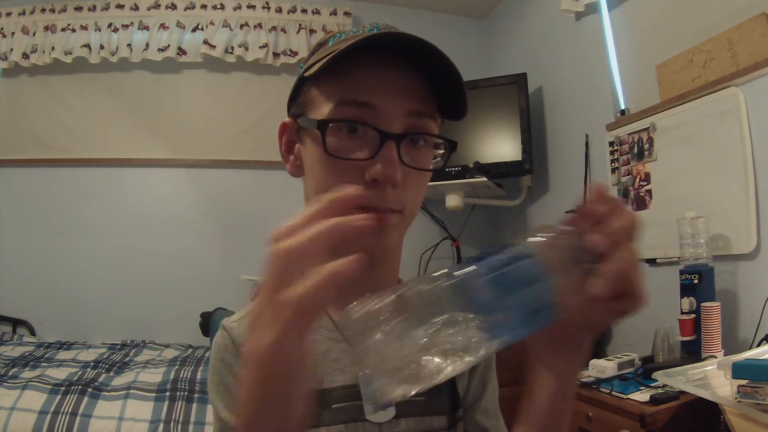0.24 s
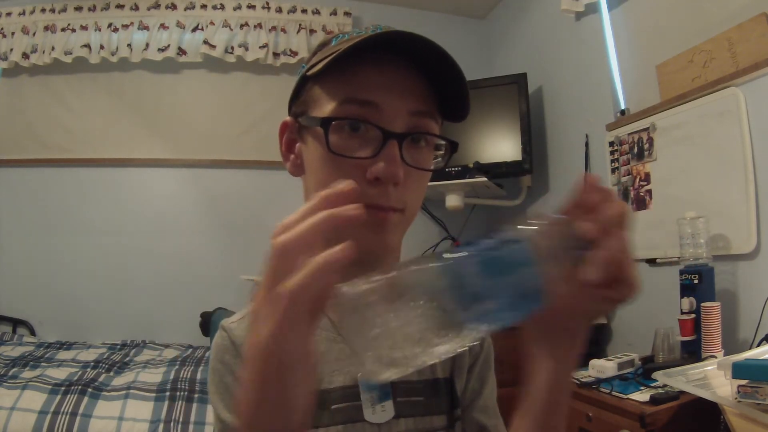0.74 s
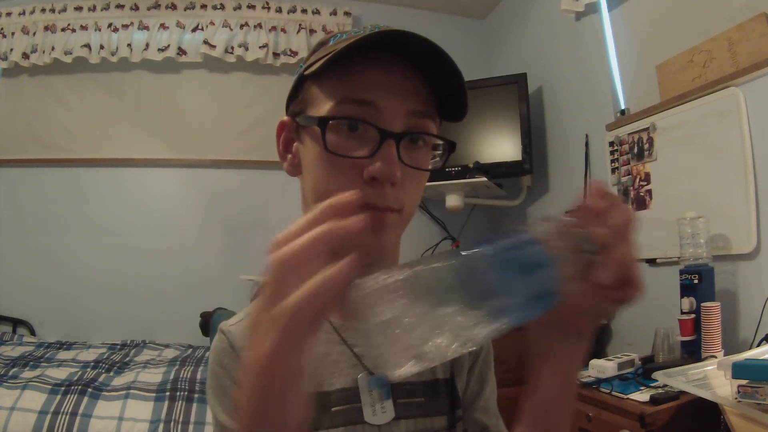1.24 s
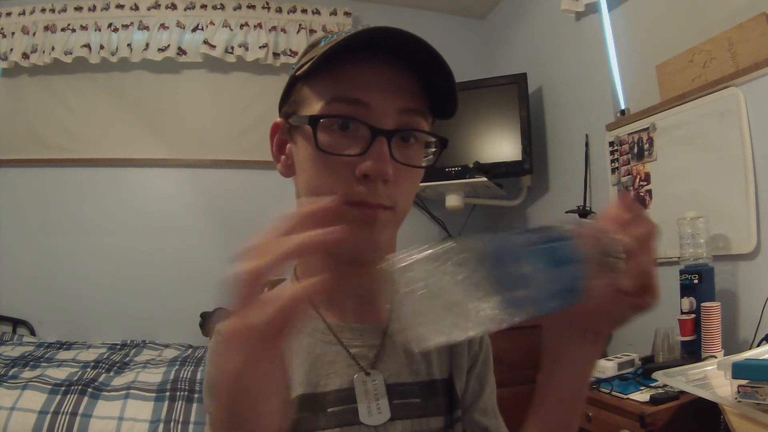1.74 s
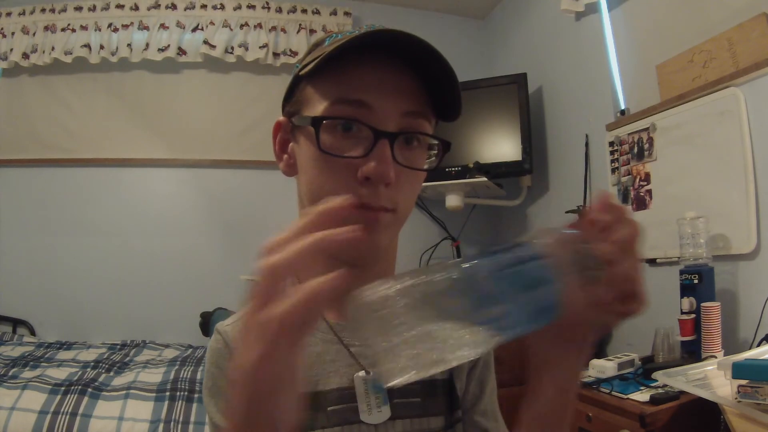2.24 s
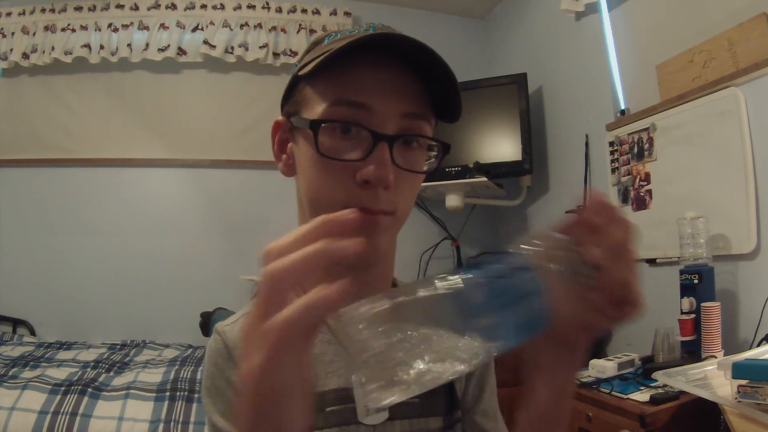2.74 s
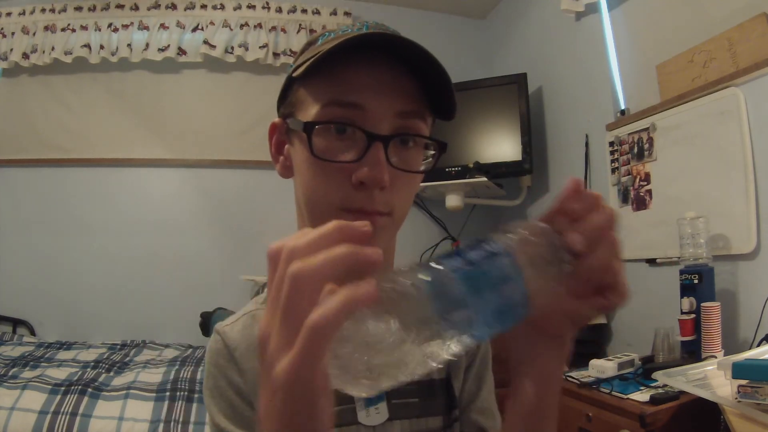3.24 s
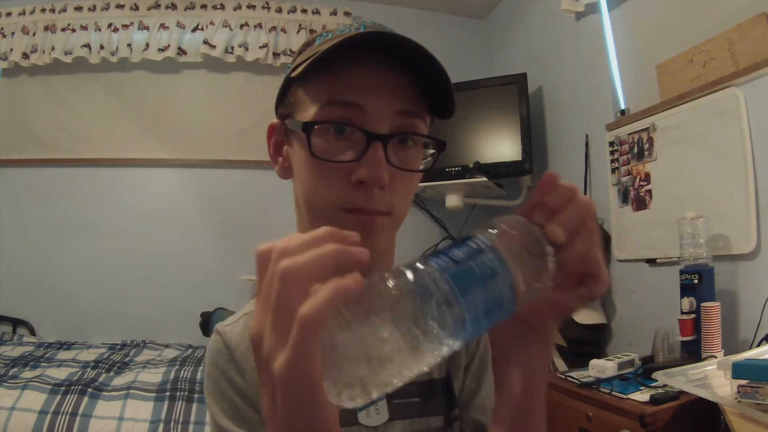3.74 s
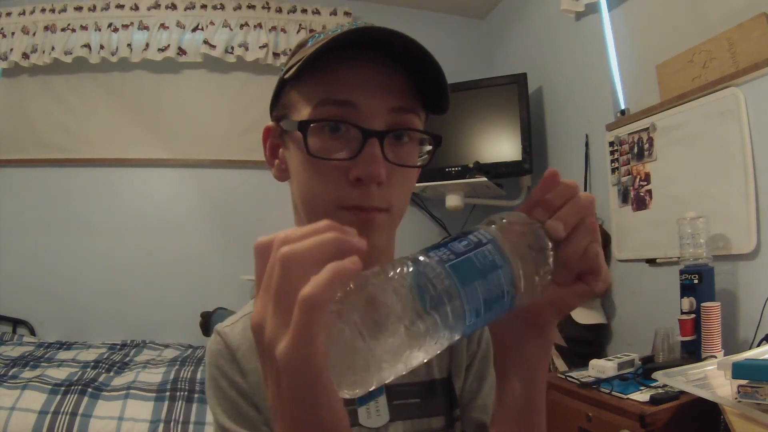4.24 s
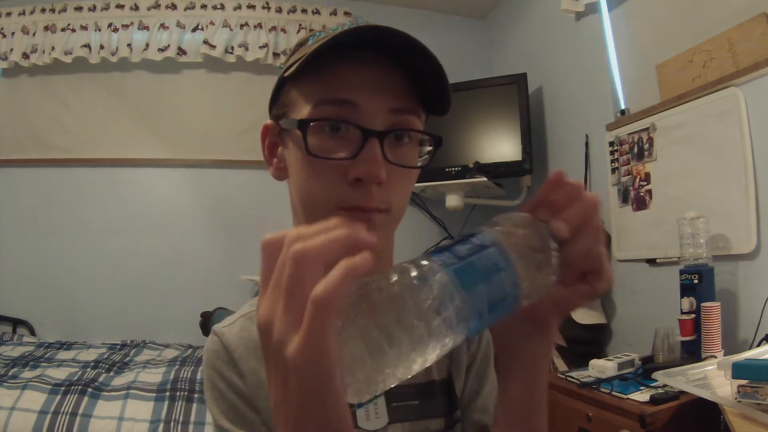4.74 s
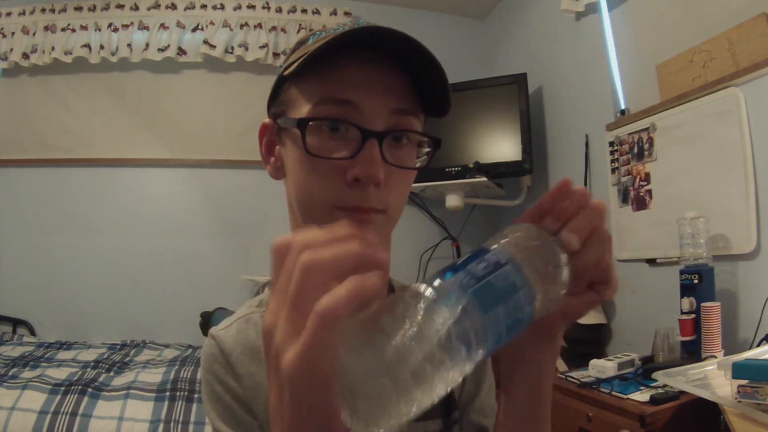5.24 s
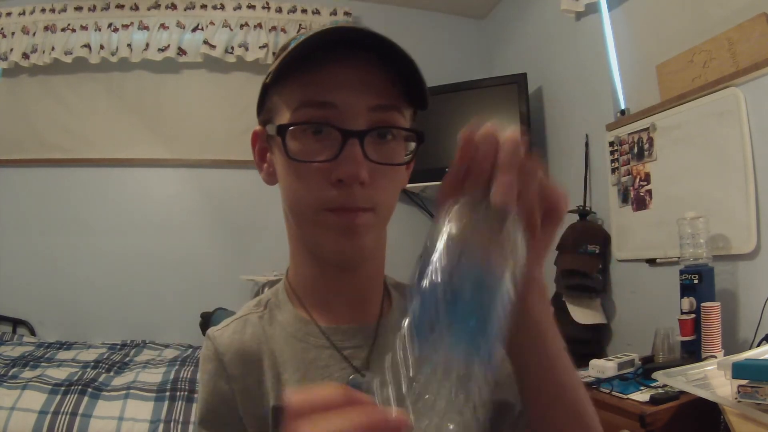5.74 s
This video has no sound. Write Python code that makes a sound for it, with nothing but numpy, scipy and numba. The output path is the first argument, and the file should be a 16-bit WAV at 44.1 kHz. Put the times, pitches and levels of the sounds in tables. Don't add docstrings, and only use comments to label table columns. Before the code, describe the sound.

Water slams rhythmically inside a flimsy plastic bottle in a quiet bedroom, with sharp crackles, fizzy spray and small pops after each thud.

```python
import sys
import numpy as np
from scipy import signal
from scipy.fft import rfft, irfft
from scipy.io import wavfile
from scipy.ndimage import uniform_filter1d, map_coordinates
from numba import njit

SR = 44100
rng = np.random.default_rng(int(sys.argv[2]) if len(sys.argv) > 2 else 0)


def gain_from_db(level_db):
    decades = np.asarray(level_db, float) / 20
    return 10 ** decades


def persist_wave(psi):
    counts = np.round(np.clip(psi, -1, 1) * 32767).astype(np.int16)
    wavfile.write(sys.argv[1], SR, np.atleast_2d(counts).T)


N = 265041

SIZE_CLASS_HZ = [
    300,
    1100,
    3300,
    8800,
]
# first_touch_s, deepest_push_s
IMPACTS = [(.5177, .5202), (1.0228, 1.0261), (1.5068, 1.5096), (1.9745, 1.9812), (2.498, 2.5015),
           (3.0445, 3.0485), (3.5752, 3.5786), (4.127, 4.1312), (4.655, 4.6598), (5.198, 5.2008),
           (5.7695, 5.7745)]


def level(x, db):
    return x * gain_from_db(db) / np.sqrt(np.mean(x ** 2))


def read(table, hz):
    f, db = np.transpose(table)
    return np.interp(np.log(np.maximum(hz, 1)), np.log(f), db)


def shaped(gain, size):
    return irfft(rfft(rng.standard_normal(size)) * gain(np.fft.rfftfreq(size, 1 / SR)), size)


def add(out, s, x):
    i = int(s * SR)
    out[i:i + len(x)] += x[:len(out) - i]


@njit
def grains(count, start, hz, cycles, gain, glide):
    out = np.zeros(count)
    for k in range(len(start)):
        i, step, envelope, phase = start[k], 2 * np.pi * hz[k] / 44100, 1., 0.
        fall = np.exp(-hz[k] / (cycles[k] * 44100))
        rise = 1 + glide[k] * (1 - fall)
        while envelope > .003 and i < count:
            out[i] += gain[k] * envelope * np.sin(phase)
            phase += step
            step = min(step * rise, 2.8)
            envelope *= fall
            i += 1
    return out


def hush():
    # pitch_hz, density_db (per Hz)
    hiss = [(15, -15), (25, 6.5), (133, -6), (173, -5), (274, -13.5), (349, -26.5), (495, -6.5), (871, -64),
            (1110, -26), (1570, -19.5), (3440, -20), (3720, -21.5), (15500, -35.5)]
    # pitch_hz, width_hz, level_db
    hum = [
        (57.3, 10, -63),
        (119.8, 9.5, -68.5),
    ]
    out = level(shaped(lambda f: gain_from_db(read(hiss, f)), N), -62)
    for hz, width, db in hum:
        out += level(shaped(lambda f: np.exp(-((f - hz) / width) ** 2), N), db)
    return out


def room(x):
    # centre_hz, t60_s, level_db
    bands = [(247, 0.21, -25.5), (1520, 0.26, -16.5), (4170, 0.21, -11), (10400, 0.2, -3)]
    gap_ms = 1.0
    t = np.arange(SR // 2) / SR
    f = np.fft.rfftfreq(len(t), 1 / SR)
    tail = 0
    for hz, t60, db in bands:
        shape = np.exp(-np.log2(np.maximum(f, 1) / hz) ** 2)
        fade = np.exp(-np.log(1000) * t / t60) * np.clip(t * 1000 / gap_ms - .5, 0, 1)
        tones = rfft(rng.standard_normal(len(t)) * fade)
        tones /= np.sqrt(uniform_filter1d(np.abs(tones) ** 2, size=25))
        band = irfft(tones * shape, len(t))
        band[-len(t) // 8:] = 0
        tail = tail + gain_from_db(db) * band / np.sqrt(np.sum(band ** 2))
    return signal.fftconvolve(x, tail)[:N]


def colour(hz):
    # pitch_hz, density_db (per Hz)
    splash = [(88, -30), (150, 1), (337, 5), (393, -4), (459, 2), (742, -3.5), (1770, -11), (2100, -7.5),
              (4810, -9), (7500, -12), (15000, -29.5)]
    octave = lambda f: read(splash, f) + 10 * np.log10(f)
    centres = np.array(SIZE_CLASS_HZ)
    return octave(hz) - np.interp(np.log(hz), np.log(centres), octave(centres))


def sloshing(t):
    # jerk_s, run_up_db, splash_db, splash_hold_s, drained_db
    swings = [(-.1, -45, -37.5, 0.049, -66), (0.418, -43, -35, 0.031, -67.5), (.925, -44, -35, 0.028, -66),
              (1.388, -47.5, -36, 0.056, -66.5), (1.878, -45.5, -37.5, 0.027, -67),
              (2.399, -47.5, -36.5, 0.036, -66.5), (2.93, -48.5, -34.5, 0.027, -66),
              (3.466, -44, -37, 0.047, -67.5), (4.007, -43.5, -34, 0.036, -65.5),
              (4.542, -45, -34.5, 0.033, -67), (5.093, -47, -35.5, 0.013, -66.5),
              (5.74, -57, -41, 0.12, -57)]
    # start_s, level_db, gurgle_db
    shakes = [
        (0.636, -25, -15),
        (2.42, -41, -8),
        (2.438, -42.5, 8),
        (2.66, -51, -7),
        (3.004, -33, 2),
        (3.254, -54, 7),
        (4.79, -57, -6),
        (5.183, -46, -10),
        (5.416, -50.5, 9.5),
    ]
    # (slosh dB, gurgle dB, spray dB)
    running, slamming, spraying = (-18, -6.5, -9.5), (7.3, 1.7, -8.5), (-15.5, -11.5, -7)
    falling, drained = (-13.5, -7, -8.5), (3.2, 3.5, -8.5)
    rise_s, contact_s, collapse_s, drain_s = 0.027, 0.0054, 0.065, 0.1356
    shake_fall_db_per_s = 394

    def sizes(db, share):
        return db + np.array([share[0], share[1], 0, share[2]])

    knots, levels = [], []
    slam_s = [-.01] + [touch for touch, _ in IMPACTS]
    next_jerk_s = [row[0] for row in swings[1:]] + [np.inf]
    for (jerk, run_db, db, hold, dry_db), slam, after in zip(swings, slam_s, next_jerk_s):
        spray = slam + contact_s
        fallen = spray + hold + collapse_s
        knots += [min(jerk + rise_s, slam), slam, spray, fallen - collapse_s, fallen,
                  min(fallen + drain_s, after), min(after, fallen + 1)]
        levels += [sizes(run_db, running),
                   sizes(run_db + 5, running),
                   sizes(db - 1.5, slamming),
                   sizes(db, spraying),
                   sizes(db - 10.5, falling),
                   sizes(dry_db + 2.5, drained),
                   sizes(dry_db, drained)]
    knots = np.maximum.accumulate(knots)
    power = gain_from_db([np.interp(t, knots, c) for c in np.transpose(levels)]) ** 2
    for s, db, gurgle_db in shakes:
        shower_db = sizes(db, (-18, gurgle_db, -19))[:, None] - shake_fall_db_per_s * np.abs(t - s)
        power += (t > s) * gain_from_db(shower_db) ** 2
    return 10 * np.log10(power)


def water():
    count, cycles, glide, base_db = 75000, 3.85, 0.0954, -3.5
    scatter_db, patchy_db, clump_db = 3.0, 3.0, 3.0
    when, size, loud, life = rng.random((count, 4)).T
    when = when * N / SR
    blobs = rng.random((1500, 2))
    blob = rng.integers(0, len(blobs), count // 3)
    clumped = len(blob)
    when[:clumped] = np.minimum(blobs[blob, 0] * N / SR + .001 * life[:clumped], N / SR)
    clump = np.zeros(count)
    clump[:clumped] = clump_db * (-np.log(1 - .98 * blobs[blob, 1]) - 1)
    hz = 150 * 100 ** np.sqrt(size)
    place = np.interp(np.log(hz), np.log(SIZE_CLASS_HZ), np.arange(4))
    motion = map_coordinates(sloshing(when), [place, np.arange(count)], order=1)
    tilt = colour(hz) + 10 * np.log10(hz / 3300) - 10 * np.log10(np.sqrt(size) + 0.12)
    patches = rng.standard_normal((16, 310))
    tilt += patchy_db * map_coordinates(patches, [2 * np.log2(hz / 150), when * 50], order=1)
    turns = cycles * (0.57 + life + 2.745 * life ** 6)
    scatter = scatter_db * np.minimum(-np.log(1 - loud), 5)
    db = motion + tilt + scatter + clump - 10 * np.log10(turns) + base_db
    return grains(N, (when * SR).astype(np.int64), hz, turns, gain_from_db(db), glide + 0 * hz)


def snaps():
    # start_s, peak_db, pitch_hz, crack_db
    buckles = [(0.033, -28, 4500, -15), (0.459, -28, 3360, -6), (0.517, -21.5, 3000, -15),
               (0.517, -25, 935, -2), (0.634, -15.5, 2235, -8.5), (0.636, -32, 905, -30),
               (1.023, -17.5, 3150, -31), (1.507, -18, 2552, -10), (1.943, -22.5, 3444, -32),
               (1.951, -25, 1077, -4), (1.973, -20, 2740, -24), (2.043, -30.5, 3425, -2.5),
               (2.439, -27.5, 2480, -6.5), (2.442, -29, 1510, -25), (2.498, -29, 1310, -22),
               (3.003, -24.5, 3080, -15), (3.005, -31, 1130, -23), (3.046, -18.5, 2330, -23),
               (3.61, -24, 2250, -4), (4.128, -22.5, 2750, -7.5), (4.572, -30.5, 3750, -13),
               (4.628, -25.5, 2450, -26), (4.656, -25, 2230, -11), (5.183, -17, 2870, -9.5),
               (5.2, -25.5, 1050, -24.5), (5.198, -24, 2840, -11), (5.769, -31.5, 1310, -17)]
    # start_s, peak_db, pitch_hz
    creaks = [(0.429, -40, 6560), (0.442, -35.5, 4190), (0.925, -47, 4020), (0.949, -37, 3900),
              (1.008, -30.5, 1390), (1.401, -46, 1890), (1.416, -42, 3620), (1.468, -29.5, 3080),
              (1.871, -35, 4000), (1.913, -35, 3240), (1.913, -36.5, 1860), (2.408, -44, 3320),
              (2.427, -33, 3800), (2.466, -33, 3470), (2.948, -38, 3800), (2.958, -39, 3470),
              (3.475, -35, 6600), (3.485, -34.5, 4060), (3.491, -37.5, 4230), (3.537, -36, 3120),
              (4.012, -40.5, 4150), (4.033, -38, 4000), (4.05, -37, 2000), (4.083, -40, 2050),
              (4.105, -40, 3270), (4.551, -34, 4170), (5.097, -44.5, 4170), (5.116, -50, 3700),
              (5.128, -48, 4740), (5.157, -33, 3340)]
    # start_s, peak_db, pitch_hz
    pops = [(0.157, -40.5, 2720), (0.187, -43.5, 1200), (0.756, -35.5, 2440), (1.063, -35, 3000),
            (1.18, -55, 2300), (1.202, -42.5, 3030), (1.636, -33.5, 2320), (1.684, -39, 5630),
            (2.163, -48, 1860), (3.149, -41, 2695), (3.231, -33, 5160), (3.231, -41, 2900),
            (3.246, -37, 3040), (3.256, -39, 3640), (3.754, -32.5, 3030), (4.154, -36, 4720),
            (4.254, -34, 1420), (4.292, -35.5, 1390), (4.326, -41, 3530), (4.805, -33.5, 3800),
            (4.812, -40, 1400), (5.318, -32, 5000), (5.341, -35, 3180), (5.394, -38.5, 3300),
            (5.415, -35.5, 2490), (5.861, -33, 1873), (5.891, -35, 1704), (5.77, -29.5, 4860),
            (5.909, -35, 2980)]
    # start_s, peak_db, pitch_hz
    drips = [(1.316, -47, 1120), (1.775, -47.5, 1130), (2.662, -46, 2360), (2.668, -46, 1056),
             (4.402, -45, 3430), (5.479, -43.5, 3110), (5.557, -37.5, 3800), (5.665, -44.5, 3120),
             (5.686, -38.5, 4600), (5.699, -41, 2700), (2.82, -46, 4500), (4.95, -44, 3520)]
    # start_s, peak_db, pitch_hz
    flicks = [(.604, -27, 1510), (.97, -28, 2480), (1.554, -29, 5300), (1.564, -28, 4500),
              (1.576, -28, 1800), (1.586, -25.5, 1300), (1.604, -25.5, 2900), (3.575, -12, 3570),
              (4.7, -18, 4000), (5.799, -26, 910), (5.808, -29, 4800), (5.863, -43, 5000)]
    # ring_cycles, crack_db
    flick = (0.94, -16.5)
    neighbours = (.9, 1.263, 2.015)
    side_db, spread, crack_ms = -8.5, 0.074, 0.84

    events = [(s, db, hz, 3.4, crack) for s, db, hz, crack in buckles]
    # (ring cycles, crack dB)
    kinds = ((creaks, (5.3, -5.5)), (pops, (3.8, -25.5)), (drips, (4.2, -19)), (flicks, flick))
    for rows, kind in kinds:
        events += [(*row, *kind) for row in rows]
    s, db, hz, cycles, crack_db = np.transpose(events)
    s = s + .0006
    chance = rng.standard_normal((len(s), 6)).T
    start, cycles = (s * SR).astype(np.int64), np.clip(cycles, .5, 6)
    out = grains(N, start, hz, cycles, gain_from_db(db), 0 * s)
    for ratio, pitch, lag in zip(neighbours, chance[:3], chance[3:]):
        later = start + (np.abs(lag) * .0008 * SR).astype(np.int64)
        side_hz = np.minimum(hz * ratio * np.exp(spread * pitch), 12000)
        gain = gain_from_db(db + side_db - 3.3 * np.log2(max(ratio, 1)))
        out += grains(N, later, side_hz, 1.64 * cycles, gain, 0 * s)
    fade = np.exp(-np.arange(400) / (crack_ms * SR / 1000))
    cracks = np.zeros(N)
    for t, g, burst in zip(s, db + crack_db, rng.standard_normal((len(s), 400))):
        add(cracks, t, gain_from_db(g + 6) * fade * burst)
    out += signal.sosfilt(signal.butter(2, 8000, fs=SR, output="sos"), cracks)
    return signal.sosfilt(signal.butter(2, 500, "high", fs=SR, output="sos"), out)


def slams():
    # start_s, peak_db, thump_hz, wall_ring_db, push_cycles
    blows = [(0.517, -20.5, 320, -4, 0.75), (1.02, -20, 290, -8.5, 0.78), (1.506, -22, 296, 2, 0.65),
             (1.974, -20, 169, -6, 0.44), (2.498, -21, 303, -25, 0.28), (3.046, -27, 151, 7, 1),
             (3.575, -27.5, 145, 7, 1), (4.124, -12.5, 277, -12, 0.23), (4.655, -13.5, 269, -8.5, 0.35),
             (5.197, -23, 220, -2.5, 0.75), (5.768, -29.5, 323, -5, 1)]
    # pitch_hz, level_db, t60_s
    modes = [(145, -5.5, 0.027), (296, -8.5, 0.039), (405, -36, 0.069), (530, 2.5, 0.026),
             (744, -2.5, 0.031), (832, -7, 0.065), (210, -29, 0.037)]
    # start_s, peak_db, pitch_hz, ring_cycles
    knocks = [(0.182, -39.5, 506, 2.3), (0.448, -45, 526, 4.4), (0.482, -37, 467, 5.5),
              (1.478, -32.5, 361, 6), (1.95, -33, 500, 7.3), (3.004, -30.5, 488, 3.7),
              (3.532, -40.5, 362, 3.9), (3.546, -34, 313, 7.2), (4.077, -44, 519, 2.6),
              (4.091, -32, 480, 5.3), (4.635, -33.5, 270, 3.2), (5.177, -33.5, 508, 6),
              (5.414, -43.5, 880, 9.3), (5.799, -36.5, 548, 6.7), (5.905, -35, 473, 1.5)]
    rattle_db, rattle_ms = -11.5, 5.7
    out, t = np.zeros(N), np.arange(SR // 5) / SR
    bright = signal.butter(1, [900, 6000], "band", fs=SR, output="sos")
    chance = rng.standard_normal((len(blows), len(modes), 2))
    for (touch, deepest), (_, db, hz, wall_db, cycles), luck in zip(IMPACTS, blows, chance):
        push_s = deepest - touch
        late = t - push_s
        if db > -14:
            hz = hz * .82
        swell = np.sin(np.pi / 2 * np.clip(t / push_s, 0, 1)) ** 2
        decay = np.exp(-np.maximum(late, 0) * hz / max(cycles, .1))
        push = -swell * decay * np.cos(2 * np.pi * hz * late)
        ring = 0
        for (f, g, t60), (uneven, detune) in zip(modes, luck):
            mode_db = g + 2.0 * uneven + wall_db * (f > 350) + (db + 18.5) / 2 * (f < 250)
            tone = np.sin(2 * np.pi * f * (1 + 0.016 * detune) * late)
            ring = ring + gain_from_db(mode_db) * np.exp(-np.log(1000) * t / t60) * tone
        add(out, touch, gain_from_db(db) * (push + np.sqrt(swell) * ring))
        rattle = signal.sosfilt(bright, rng.standard_normal(len(t)) ** 3 / 4)
        rattle *= np.exp(-(t * 1000 / rattle_ms) ** 2)
        add(out, touch, gain_from_db(db + wall_db / 2 + rattle_db) * rattle)
    s, db, hz, cycles = np.transpose(knocks)
    out += grains(N, (s * SR).astype(np.int64), hz, np.clip(cycles, .5, 20), gain_from_db(db), 0 * s)
    return signal.sosfilt(signal.butter(1, 50, "high", fs=SR, output="sos"), out)


def scene():
    hits = slams() + snaps()
    splash = water()
    return (hits + splash + room(hits + 0.27 * splash) + hush())[None]


def low_pass(x):
    return signal.sosfilt(signal.butter(12, 16320, fs=SR, output="sos"), x)


def record(dry):
    dry = signal.sosfilt(signal.butter(2, 30, "high", fs=SR, output="sos"), dry)
    dry = signal.sosfilt(signal.ellip(10, .2, 70, 15250, fs=SR, output="sos"), dry)
    return low_pass(dry)


dry = scene()
out = record(dry)
persist_wave(out)
```